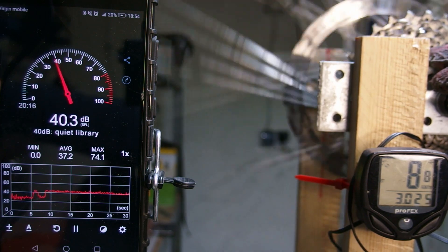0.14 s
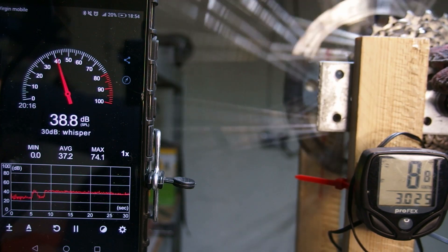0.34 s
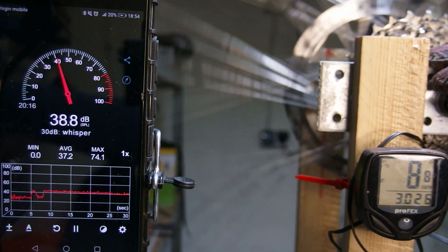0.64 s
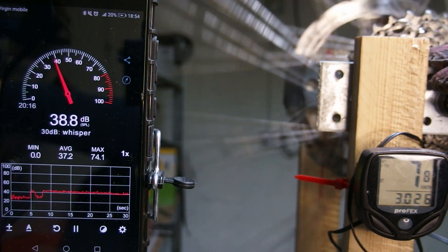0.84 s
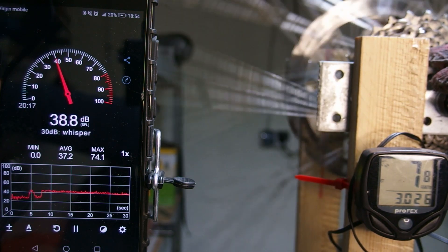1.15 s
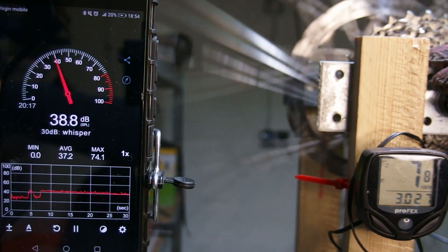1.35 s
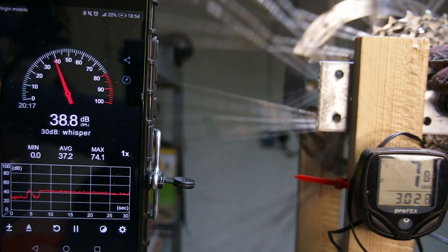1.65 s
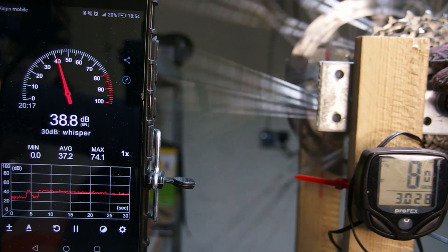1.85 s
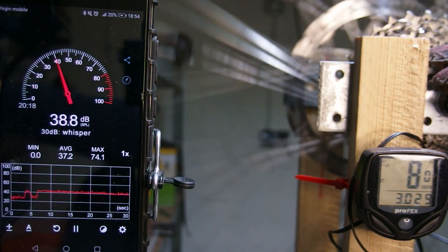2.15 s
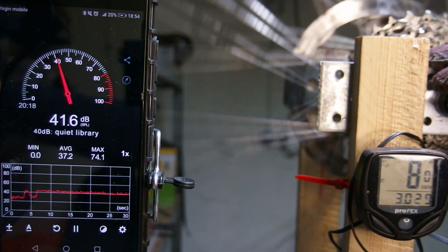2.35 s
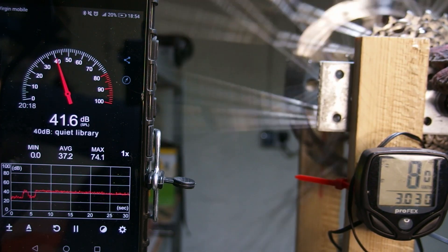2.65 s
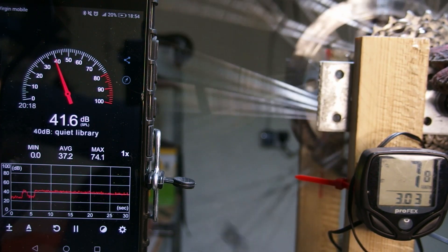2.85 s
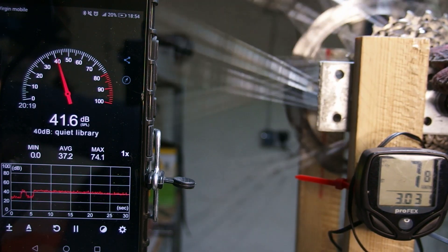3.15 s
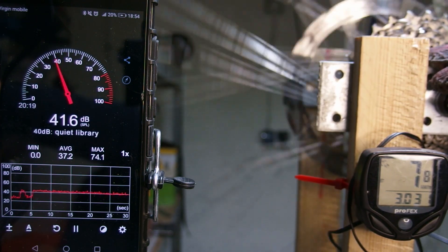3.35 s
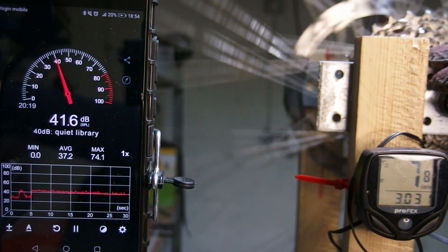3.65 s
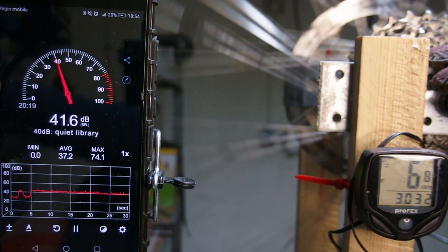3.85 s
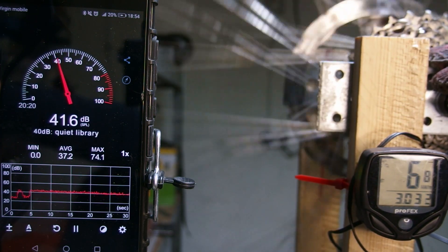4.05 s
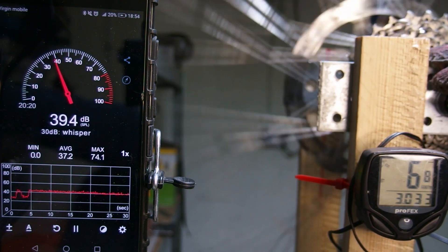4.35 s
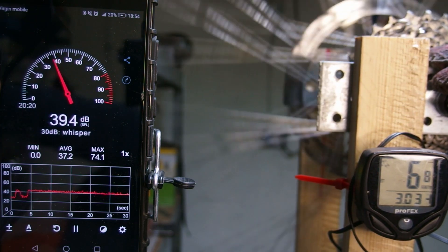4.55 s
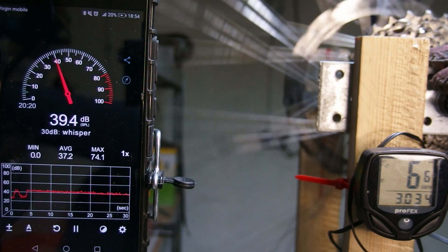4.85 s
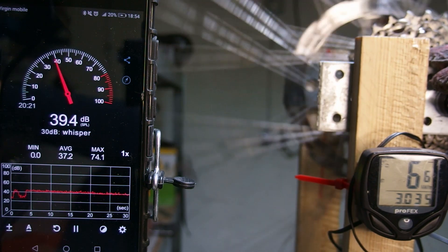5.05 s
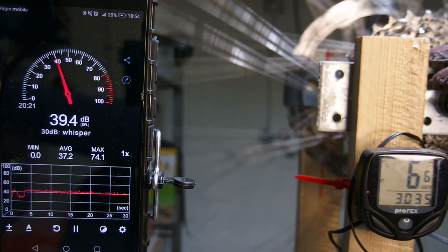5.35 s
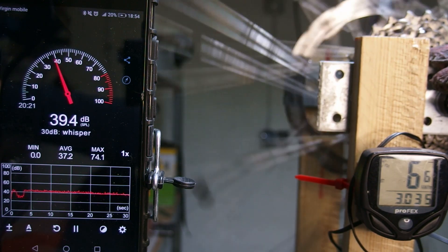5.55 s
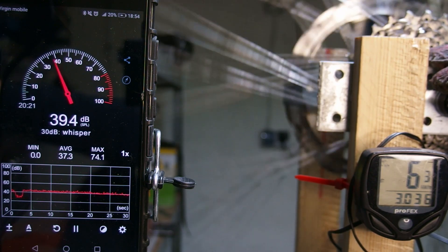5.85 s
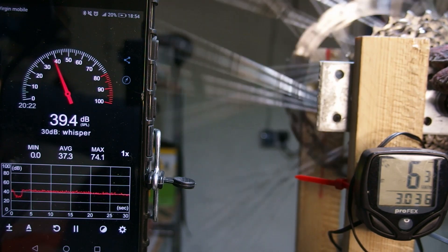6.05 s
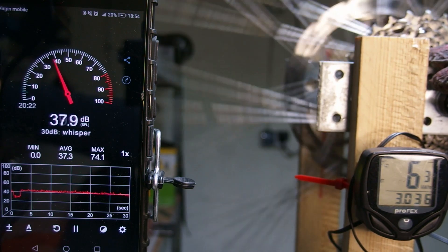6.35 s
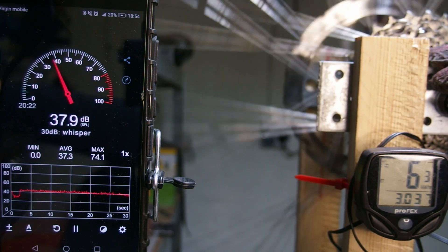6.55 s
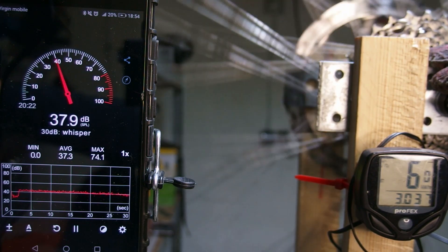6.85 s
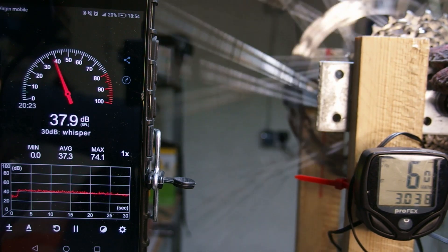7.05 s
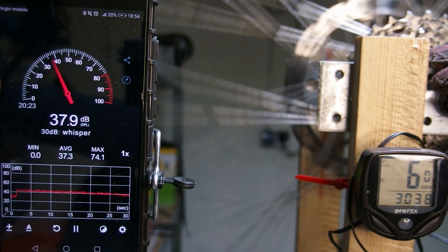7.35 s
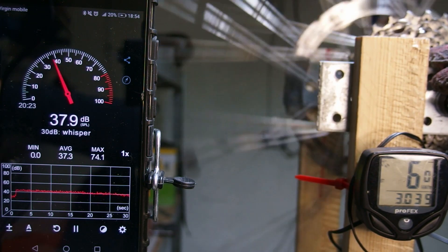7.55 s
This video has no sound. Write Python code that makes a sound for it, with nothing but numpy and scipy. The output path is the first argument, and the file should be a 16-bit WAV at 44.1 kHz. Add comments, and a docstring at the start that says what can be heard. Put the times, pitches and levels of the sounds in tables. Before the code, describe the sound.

Rapid metallic ticking from a freewheeling bicycle hub sits close to a stereo microphone, so dense at first that it is nearly a buzz. The clicks ring briefly and spread a little further apart as the wheel loses speed, without stopping. Underneath are the quiet, low air of a small workshop and, early on, three barely audible hollow knocks.

```python
"""A small workshop, where a bicycle wheel coasts on a stand close to a stereo microphone and slowly slows.
Three pawls drop off each of the freehub's 24 teeth: a steel snap, then hub, sprockets and spokes ring on.
Every tooth has its own voice, so the pattern comes round once a turn; the room blurs the gaps.
Behind the ticking lie a low rush of air and three faint, dull knocks."""
import sys
import numpy as np
from scipy import signal
from scipy.fft import rfft, irfft, next_fast_len
from scipy.io import wavfile

SR = 44100
rng = np.random.default_rng(int(sys.argv[2]) if len(sys.argv) > 2 else 0)


def output_pcm(signal):
    """Save a mono or channel-first signal as 16-bit PCM at the path in sys.argv[1].

    Samples are clipped to [-1, 1] before scaling.
    """
    pcm = np.clip(np.atleast_2d(signal).T, -1, 1) * 32767
    wavfile.write(sys.argv[1], SR, np.round(pcm).astype(np.int16))


N = 339129
TOOTH_COUNT, PAWL_COUNT = 24, 3
SNAP_T60_S = .012
CLICK_SAMPLES, LEAD_SAMPLES = 8192, int(.3 * SR)   # the lead lets the scene open on a ringing wheel


def from_db(db):
    """Decibels as a gain."""
    return 10 ** (np.asarray(db) / 20)


def at_hz(points, hz, column=1):
    """Read a table on a log-frequency axis."""
    table = np.array(points)
    return np.interp(np.log(hz + 1), np.log(table[:, 0]), table[:, column])


def bins(size):
    """Frequencies of a real FFT."""
    return np.arange(size // 2 + 1) * SR / size


def decay(t, t60):
    """Silence until t = 0, then a fall of 60 dB every t60 seconds."""
    return (t >= 0) * np.exp(-np.log(1000) * np.maximum(t, 0) / t60)


def bell(hz, centre_hz, octaves):
    """A bell curve of height 1 around a frequency."""
    return np.exp(-.5 * (np.log2((hz + 1) / centre_hz) / octaves) ** 2)


def causal(gain):
    """Minimum-phase filter with this gain: nothing sounds before the blow."""
    cepstrum = irfft(np.log(gain))
    half = len(cepstrum) // 2
    cepstrum[1:half] *= 2
    cepstrum[half + 1:] = 0
    return np.exp(rfft(cepstrum))


def to_stereo(mid, side, likeness):
    """Left and right from mid and side; likeness, held within +-0.97, sets their correlation."""
    likeness = np.clip(likeness, -.97, .97)
    return np.sqrt(1 + likeness) * mid + np.sqrt(1 - likeness) * side * [[1], [-1]]


# Room tone. Each row: frequency in Hz, relative level in dB, left-right correlation.
ROOM_TONE = [(20, -20, -.3), (40, -5.5, -.45), (70, 3, -0.55), (120, 1.2, -0.45), (176, -2.5, 0.18),
             (214, -0.5, 0.36), (314, -4, 0.27), (393, -1.5, 0.28), (510, -4.5, 0.19), (612, -3, 0.45),
             (990, -33, 0.35), (3000, -20, 0.78)]
def workshop_air(level_db=-47):
    """The low, steady rush of the workshop, leaning a little to the left."""
    hz = bins(N)
    mid, side = rfft(rng.standard_normal((2, N))) * from_db(at_hz(ROOM_TONE, hz))
    rush = irfft(to_stereo(mid, side, at_hz(ROOM_TONE, hz, column=2)), N) * from_db([[1], [-1]])
    return from_db(level_db) * rush / rush.std()


# Background knocks. Each row: start in seconds, pitch in Hz, level in dB before the envelope.
DULL_KNOCKS = [(.641, 743, -41), (1.35, 700, -41), (3.286, 760, -44)]
def knocks(width_hz=74, t60_s=.2):
    """Each knock is a short, hollow ring: a narrow band of noise that rises fast and dies away."""
    t, out = np.arange(N) / SR, np.zeros(N)
    for start, pitch, level_db in DULL_KNOCKS:
        band = signal.butter(2, [pitch - width_hz / 2, pitch + width_hz / 2], "band", fs=SR, output="sos")
        ring = signal.sosfilt(band, rng.standard_normal(N))
        envelope = decay(t - start, t60_s) - decay(t - start, SNAP_T60_S)
        out += from_db(level_db) * ring / ring.std() * envelope
    return out


def mode_burst(tooth, envelope, repeat_share=.62):
    """Two noise spectra a drop, for modes too dense to tell apart; a tooth sounds alike on every turn."""
    envelope = envelope / np.linalg.norm(envelope, axis=-1, keepdims=True)
    own = rng.standard_normal((TOOTH_COUNT, 2, envelope.shape[-1]))[tooth]
    fresh = rng.standard_normal(own.shape)
    modes = np.sqrt(repeat_share) * own + np.sqrt(1 - repeat_share) * fresh
    return rfft(modes * envelope, CLICK_SAMPLES)


# Reverb balance. Each row: frequency in Hz, level of the room against the direct sound in dB.
REVERB_MIX = [(800, 7), (1500, -2.5), (3000, -3), (4200, -1), (6000, -7.5), (8000, -12.5), (14000, -27)]
def add_room(direct, tooth, hz, wall_s=.0135, wall_db=-13, predelay_s=.008, t60_s=.28):
    """A near wall and a diffuse tail answer each click, differently in each channel."""
    t = np.arange(CLICK_SAMPLES) / SR
    wall_power = from_db(wall_db) ** 2 * decay(t - wall_s, SNAP_T60_S) ** 2 / SNAP_T60_S
    tail_power = decay(t - predelay_s, t60_s) ** 2 / t60_s
    reflections = mode_burst(tooth, np.sqrt(wall_power + tail_power))
    wet = from_db(at_hz(REVERB_MIX, hz))
    return (direct + wet * reflections) / np.sqrt(1 + wet ** 2)


# Stereo placement of the hub. Each row: frequency in Hz, left minus right in dB.
HUB_PAN = [(700, 1), (1000, -3.5), (1500, -2), (1900, -4.5), (2400, -4), (3000, -2), (3700, 1.5),
           (4200, -4.5), (5400, 2.5), (7000, -1.5), (8600, -1), (11000, -5), (15000, -6)]
def hub_position(hz, left_lag_s=.00003):
    """The hub sits a little to the right, so its sound reaches the left channel later."""
    gains = from_db(at_hz(HUB_PAN, hz) * [[.5], [-.5]])
    lag = np.exp(-2j * np.pi * hz * left_lag_s * [[1], [0]])
    return gains / np.linalg.norm(gains, axis=0) * lag


# Broad tone of the wheel. Each row: frequency in Hz, gain in dB.
WHEEL_EQ = [(500.0, -35.5), (750.0, -15), (1100.0, -14), (1500.0, -11.5), (2000.0, -10.5), (2500.0, -8.0),
            (3300.0, -6.5), (4300.0, -0.5), (5400.0, -11), (7200.0, -6.5), (9000.0, -10.5), (11800.0, -17),
            (13700.0, -11.5), (15600.0, -20.5)]
# Ringing metal. Each row: pitch in Hz, width in Hz, left gain in dB, right gain in dB.
WHEEL_MODES = [(834.3, 5.8, 14, 13.5), (986, 21, 4, 6.5), (1148, 17, 9.5, 1), (1274, 22.6, 10.5, 11),
               (1537, 35.7, 15.5, 15.5), (1564, 16, 1, -2), (1685, 23.7, 10, 12.5), (1917, 20, 10.5, 4.5),
               (2202, 8.7, 8.5, 7), (2788, 87, 7.5, 7.5), (3016, 114, 6.5, 12.5), (3096, 22, 7, 3.5),
               (3546, 9, 12, 8.5), (3585, 10, -6, 10), (3770, 91, 1, 8.5), (4176, 39, 11, 4),
               (4493, 44, 4, 4.5), (4800, 7.6, 9, 10.5), (5070, 10, 9, 0), (7690, 37, 13.5, 6),
               (7980, 105, -1, 10), (10200, 21, 10.5, 9), (11000, 66, -2, 7), (13300, 42, 13.5, 7.5)]
def wheel_body(hz):
    """Hub, sprockets and spokes filter every click: a broad colour with ringing peaks on top."""
    response = causal(from_db(at_hz(WHEEL_EQ, hz)))
    for centre, width, left_db, right_db in WHEEL_MODES:
        detune, damping = centre ** 2 - hz ** 2, 1j * width * hz
        response = response * (detune + from_db([[left_db], [right_db]]) * damping) / (detune + damping)
    return response


def coasting(t, start_turns_per_s=1.34872, friction_turns_per_s2=.030518, drag_per_s=.017):
    """Speed in turns a second and angle in turns, as bearing friction and drag slow the wheel."""
    offset = friction_turns_per_s2 / drag_per_s
    speed = (start_turns_per_s + offset) * np.exp(-drag_per_s * t) - offset
    return speed, (start_turns_per_s - speed) / drag_per_s - offset * t


# Pulsing tones. Each row: pitch in Hz, width in Hz, angle of a lobe in turns, swell depth in dB.
TURNING_LOBES = [(850, 56, 0.074, 3.5), (10165, 71, 0.28, 5)]
def sweep_lobes(sound):
    """A wheel mode's two lobes sweep past the microphone, so its tone swells twice a turn."""
    _, turns = coasting(np.arange(N) / SR)
    out = sound
    for centre, width, angle, swell_db in TURNING_LOBES:
        tone = signal.lfilter(*signal.iirpeak(centre, centre / width, fs=SR), sound)
        swell = from_db(swell_db * np.cos(4 * np.pi * (turns - angle)))
        out = out + tone * (swell / np.sqrt(np.mean(swell ** 2)) - 1)
    return out


def wobble(depth, crest, per_turn):
    """The ratchet ring runs out of true: a swing for each tooth, with a crest at an angle in turns."""
    return depth * np.cos(2 * np.pi * per_turn * (np.arange(TOOTH_COUNT) / TOOTH_COUNT - crest))


def tooth_colours(hz, scatter_db=1.0, spoke_delay_s=.00268):
    """Each tooth shakes spokes and sprockets in its own way; slow bending waves make the spokes late."""
    spokes, sprockets, top = bell(hz, 1500, .417), bell(hz, 3070, .15), bell(hz, 9900, .31)
    delay = np.exp(-2j * np.pi * np.cumsum(spoke_delay_s * spokes) * hz[1])
    spokes_db = wobble(.4, crest=.13, per_turn=1) + wobble(.34, crest=-.2, per_turn=9)
    sprockets_db = wobble(1.2, crest=.11, per_turn=2) + wobble(1.2, crest=.5, per_turn=9)
    top_db = .7 + wobble(.4, crest=.3, per_turn=9)
    bands_db = np.transpose([spokes_db, sprockets_db, top_db])
    bands_db = bands_db + scatter_db * rng.standard_normal(bands_db.shape)
    curves_db = bands_db @ np.array([spokes, sprockets, top])
    return delay * np.array([causal(from_db(curve)) for curve in curves_db])


# Drops that land harder than the rest. Each row: approximate time in seconds, extra level in dB.
ACCENTS = [(.107, 2), (1.642, 1.5)]
def pawl_drops(jitter_s=.0002, tooth_scatter_db=.37, drop_scatter_db=.71, db_per_tenfold_speed=3):
    """The pawls drop as each tooth passes, softer as the wheel slows: times, teeth and forces in dB."""
    t = np.arange(-LEAD_SAMPLES, N) / SR
    speed, turns = coasting(t)
    teeth_passed = TOOTH_COUNT * turns - .45   # the first drop is .45 of a tooth away
    number = np.arange(int(teeth_passed[0]) + 1, int(teeth_passed[-1]) + 1)
    tooth = number % TOOTH_COUNT
    late_s = wobble(.00043, crest=.346, per_turn=3)[tooth] + jitter_s * rng.standard_normal(len(number))
    when = np.interp(number, teeth_passed, t) + late_s
    tooth_db = wobble(.56, crest=.22, per_turn=2) + tooth_scatter_db * rng.standard_normal(TOOTH_COUNT)
    force_db = tooth_db[tooth] + db_per_tenfold_speed * np.log10(np.interp(when, t, speed))
    force_db += drop_scatter_db * rng.standard_normal(len(number))
    for time_s, extra_db in ACCENTS:
        force_db[np.argmin(abs(when - time_s))] += extra_db
    return when, tooth, force_db


def pawl_snaps(tooth, t, spacing_s=.0013, uneven_db=1.5):
    """Envelope of each drop: the pawls land one just after the other, with unequal strength."""
    waits = spacing_s * rng.uniform(.3, 1.7, (TOOTH_COUNT, PAWL_COUNT))
    landing = (np.cumsum(waits, axis=1) - waits[:, :1])[tooth]
    strength = from_db(uneven_db * rng.standard_normal(landing.shape))
    strength /= np.linalg.norm(strength, axis=1, keepdims=True)
    snaps = (strength[:, [k]] * decay(t - landing[:, [k]], SNAP_T60_S) for k in range(PAWL_COUNT))
    return np.sqrt(sum(snap ** 2 for snap in snaps))


def strike_main_modes(direct, hz, centre_hz=1592, peak_share=.55):
    """Every drop strikes the main modes alike: there a clean blow replaces part of the dense ringing."""
    share = np.maximum(peak_share * bell(hz, centre_hz, octaves=.1), .001)
    return np.sqrt(1 - share) * direct + causal(np.sqrt(share))


# Bite of the attack. Each row: frequency in Hz, energy of the snap against the ring in dB.
SNAP_BITE = [(800, -7.5), (1500, -5), (2200, -4), (3000, 0.5), (4200, -1), (5800, -4), (8000, 0),
             (11000, 2), (15000, 4.5)]
# Stereo width of a click. Each row: frequency in Hz, left-right likeness (negative is out of phase).
CLICK_LIKENESS = [(800, 0.99), (1600, 0.9), (3000, 0.95), (4300, 1), (5200, 0.0053), (6000, -1.26),
                  (7000, -0.65), (8000, 0.46), (11000, -0.14), (15000, -0.49)]
def steel_clicks(tooth, hz, ring_rise_s=.0028, ring_t60_s=.12):
    """Spectrum of each drop: a bright snap, then a ring that swells as it spreads into the wheel."""
    t = np.arange(int(.1 * SR)) / SR
    snap = mode_burst(tooth, pawl_snaps(tooth, t)[:, None])
    ring = mode_burst(tooth, (1 - np.exp(-t / ring_rise_s)) * decay(t, ring_t60_s))
    bite = from_db(at_hz(SNAP_BITE, hz))
    blow = (bite * snap + ring) / np.sqrt(2 + 2 * bite ** 2)   # snap and ring share the energy
    stereo = to_stereo(blow[:, :1], blow[:, 1:], at_hz(CLICK_LIKENESS, hz))
    return strike_main_modes(stereo, hz)


def ratchet():
    """The freehub ticks: one click for each drop, with the room's answer and its tooth's colour."""
    when, tooth, force_db = pawl_drops()
    hz = bins(CLICK_SAMPLES)
    spectra = add_room(steel_clicks(tooth, hz), tooth, hz)
    clicks = irfft(spectra * tooth_colours(hz)[tooth, None])
    out = np.zeros((2, LEAD_SAMPLES + N + 2 * CLICK_SAMPLES))
    for start, gain, click in zip(LEAD_SAMPLES + (when * SR).astype(int), from_db(force_db), clicks):
        out[:, start:start + CLICK_SAMPLES] += gain * click
    return out[:, LEAD_SAMPLES:LEAD_SAMPLES + N]


def scene(wheel_rms_db=-24):
    """The ratchet rings through the turning wheel, up front, over the knocks and the air."""
    size = 2 * next_fast_len((N + SR) // 2)   # a spare second for the ring to die away
    hz = bins(size)
    spectrum = rfft(ratchet(), size) * hub_position(hz) * wheel_body(hz)
    wheel = sweep_lobes(irfft(spectrum)[:, :N])
    return from_db(wheel_rms_db) * wheel / wheel.std() + knocks() + workshop_air()


def record(dry, cutoff_hz=15800):
    """A steep low-pass takes off the very top."""
    return signal.sosfilt(signal.ellip(12, .2, 80, cutoff_hz, fs=SR, output="sos"), dry)


dry = scene()
out = record(dry)
output_pcm(out)
```